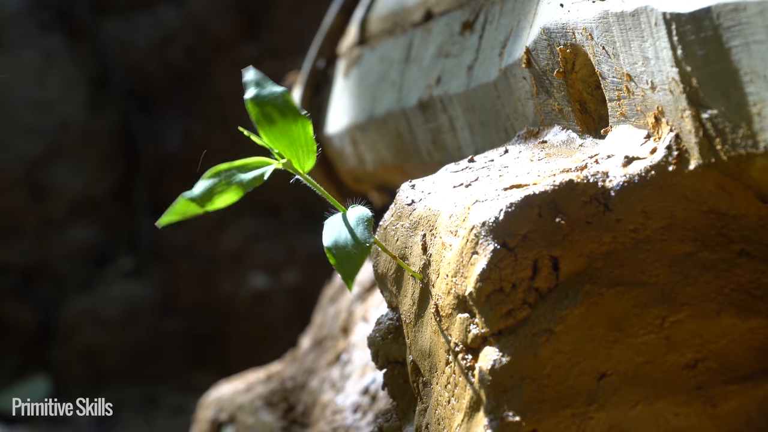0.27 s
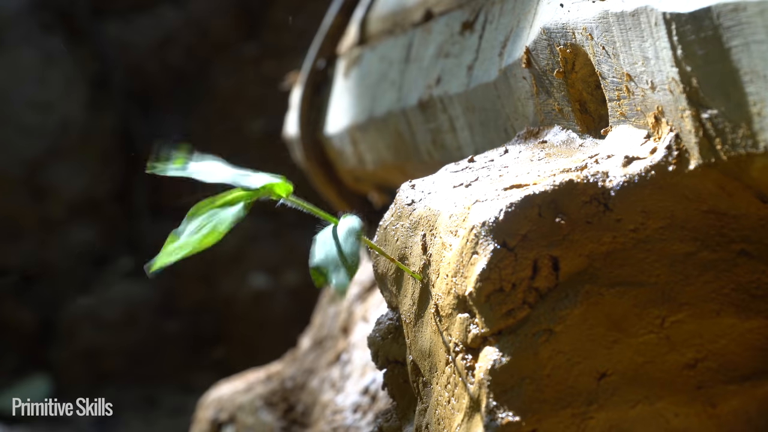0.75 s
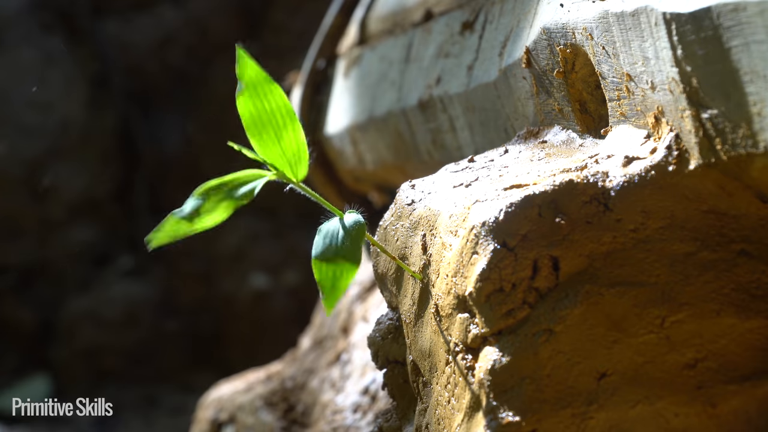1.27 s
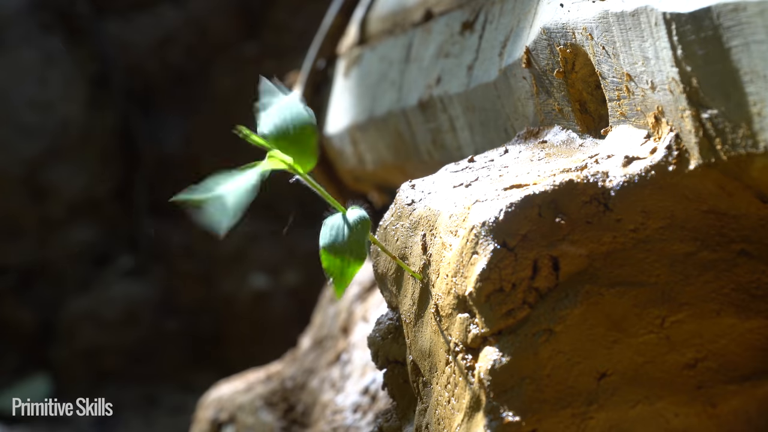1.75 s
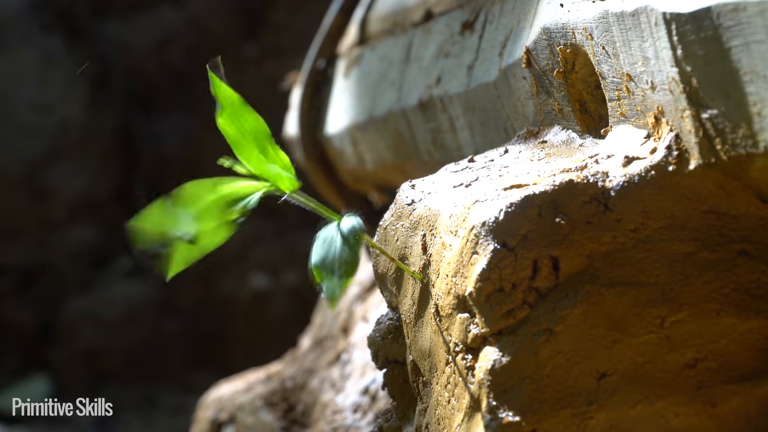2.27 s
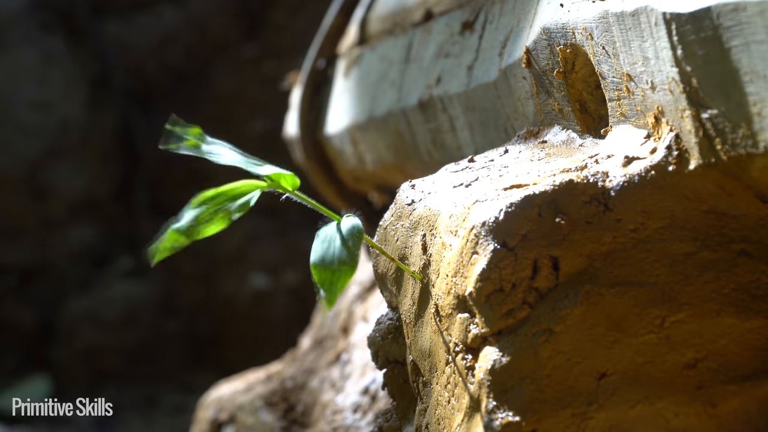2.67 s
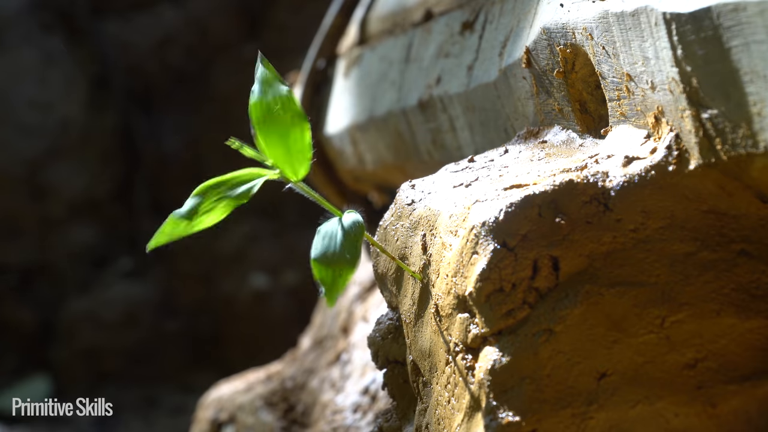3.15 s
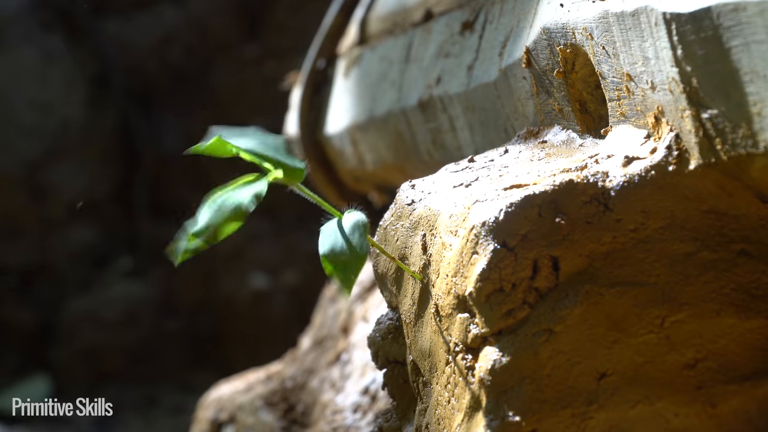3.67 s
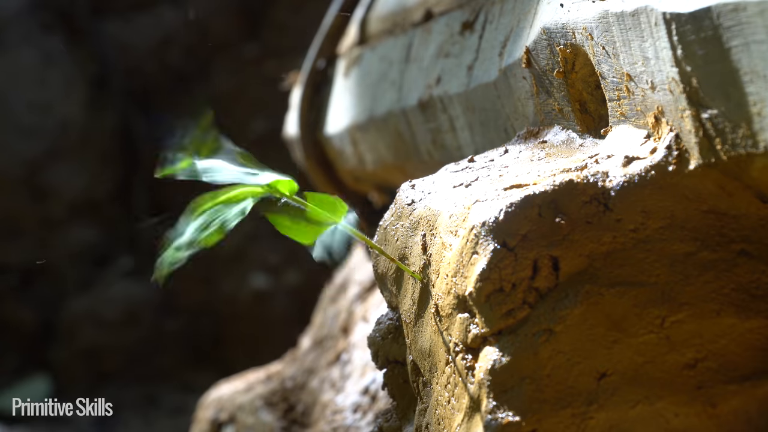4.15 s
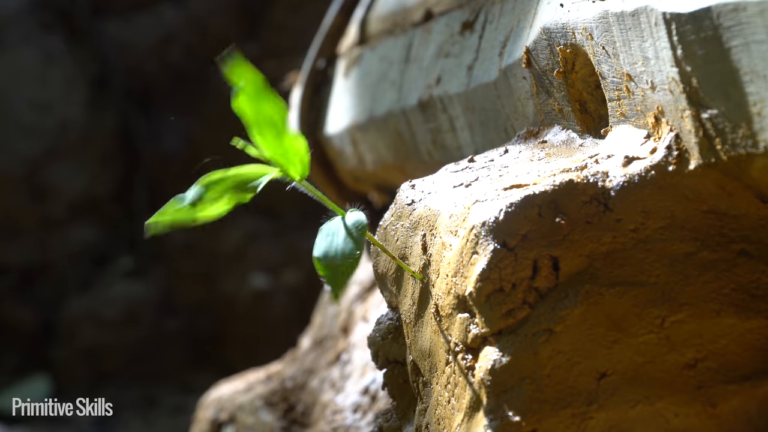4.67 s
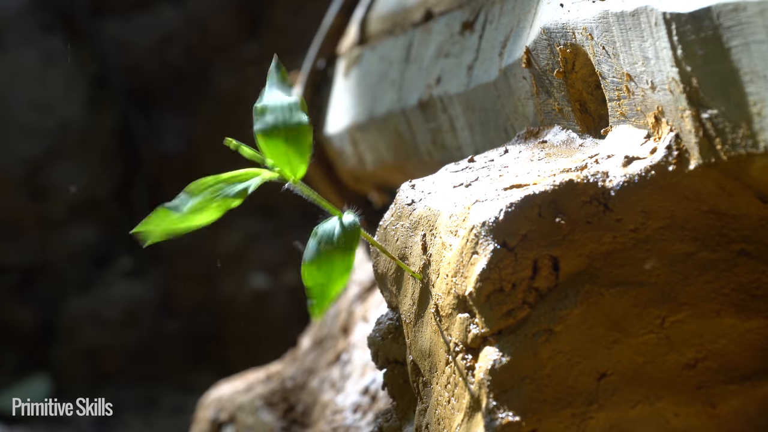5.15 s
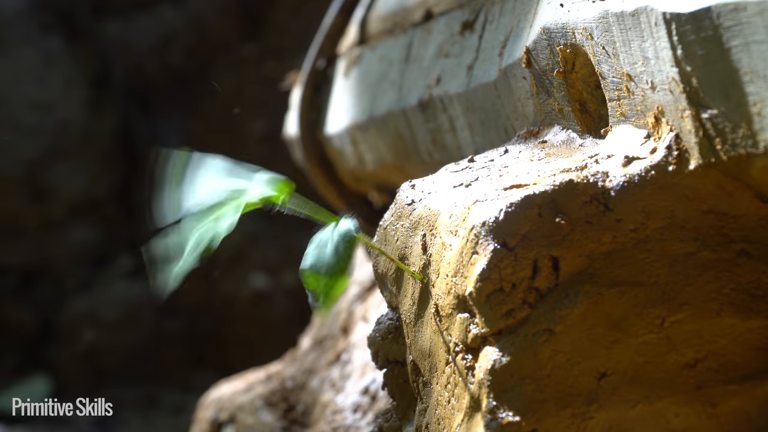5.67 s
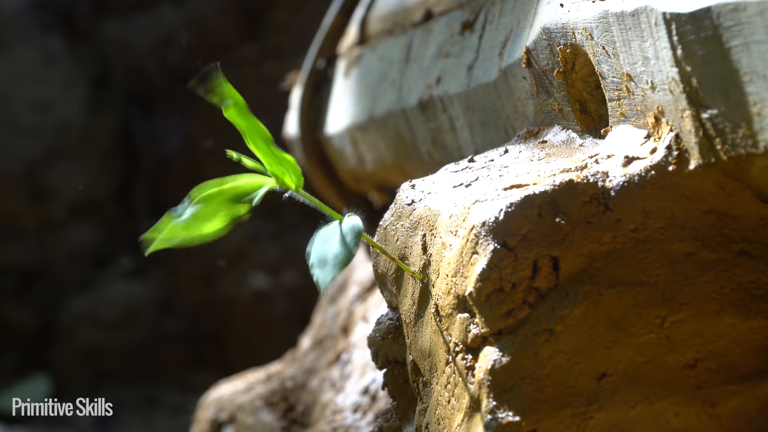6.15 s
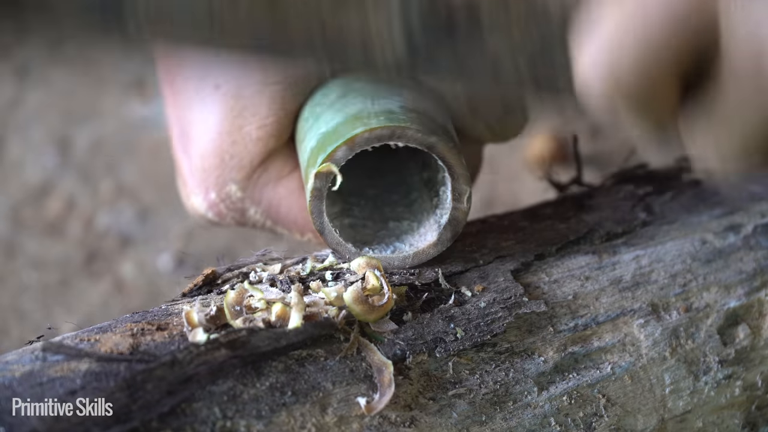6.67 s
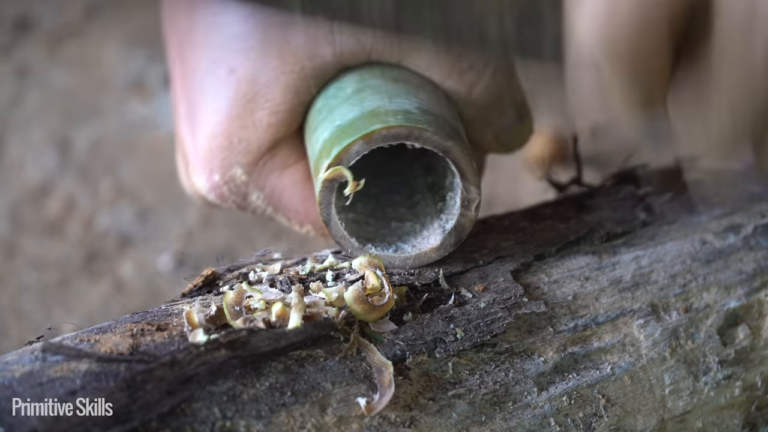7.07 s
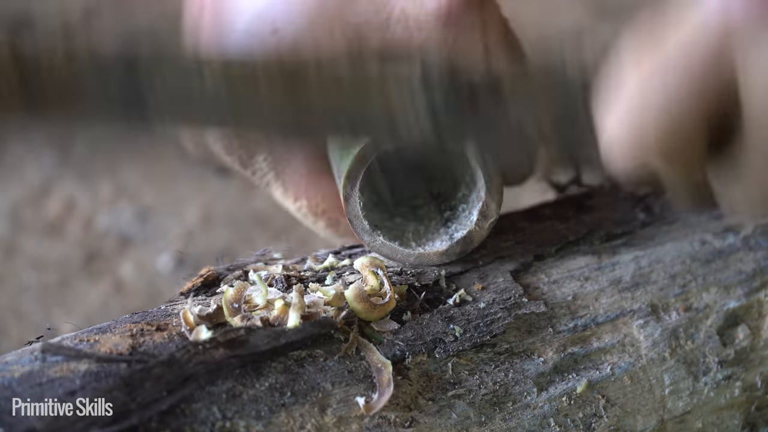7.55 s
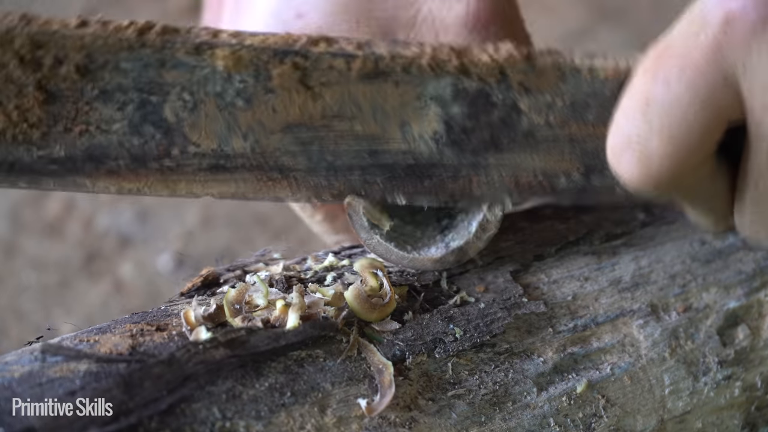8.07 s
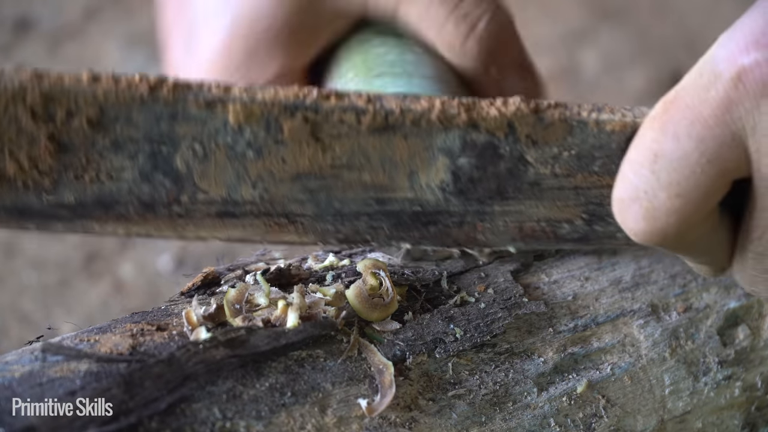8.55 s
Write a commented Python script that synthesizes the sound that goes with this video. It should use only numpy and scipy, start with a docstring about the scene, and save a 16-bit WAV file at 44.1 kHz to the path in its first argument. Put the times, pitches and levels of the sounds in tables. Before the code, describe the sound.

A wooden piston bellows pushes and pulls hoarse, hooting gusts of air with clacking flaps, then a heavy blade chops bamboo seven times.

```python
"""Air is already rushing through a wooden piston bellows as it blows into a clay furnace.
Shaped noise makes the rush, and the blowpipe hoots unevenly at its main resonance.
Ringing valve flaps clack and the hollow barrel thumps as the strokes turn.
Then a heavy blade pares a bamboo tube in seven quick chops: ringing blows, snapping fibres, echoes.
Two chops also knock on the log; a soft outdoor background of shaped noise runs throughout."""
import sys
import numpy as np
from scipy import signal
from scipy.fft import rfft, irfft
from scipy.io import wavfile
from scipy.ndimage import uniform_filter1d

SR = 44100
rng = np.random.default_rng(int(sys.argv[2]) if len(sys.argv) > 2 else 0)


def wav_record(signal):
    """Record a signal, one row per channel, as 16-bit PCM in the file named by sys.argv[1]."""
    frames = np.transpose(np.atleast_2d(signal))
    bounded = np.clip(frames, -1, 1)
    # unit amplitude maps onto the largest positive 16-bit level
    quanta = np.round(bounded * 32767).astype(np.int16)
    wavfile.write(sys.argv[1], SR, quanta)


N = 388080
TIME = np.arange(N) / SR


def amp(db):
    """Turn decibels into gain."""
    return 10 ** (np.asarray(db) / 20)


def unit(x):
    """Scale to rms 1."""
    return x / np.sqrt(np.mean(x ** 2))


def peak(x):
    """Scale to peak 1."""
    return x / np.max(np.abs(x))


def add(out, s, x):
    """Mix in a short sound at time s, if its start lies within the scene."""
    i = int(s * SR)
    if 0 <= i < N:
        out[i:i + len(x)] += x[:N - i]


def walk(rate_hz):
    """Smooth random wander with rms 1; a higher rate wanders faster."""
    hold = int(SR / rate_hz)
    steps = np.repeat(rng.standard_normal(N // hold + 1), hold)
    return unit(uniform_filter1d(steps, hold)[:N])


def colour(x, points):
    """Shape a sound by a spectrum of (frequency [Hz], gain [dB]) points."""
    hz, db = np.transpose(points)
    f = np.maximum(np.fft.rfftfreq(len(x), 1 / SR), 1)
    gain = amp(np.interp(np.log(f), np.log(hz), db))
    return irfft(rfft(x) * gain, len(x))


def lowpass(x, hz, order):
    """Soften the treble above hz."""
    return signal.sosfilt(signal.butter(order, hz, fs=SR, output="sos"), x)


def highpass(x, hz, order=2):
    """Thin out the bass below hz."""
    return signal.sosfilt(signal.butter(order, hz, "high", fs=SR, output="sos"), x)


def resonate(x, hz, width_hz):
    """One resonance with gain 1 at its centre."""
    return signal.lfilter(*signal.iirpeak(hz, hz / width_hz, fs=SR), x)


def ring(modes, detune, scatter_db):
    """Struck modes; each blow shifts their pitch and strength a little; wider modes die faster."""
    t = TIME[:SR // 6]
    sound = np.zeros(len(t))
    chance = rng.standard_normal((len(modes), 2))
    for (hz, width_hz, db), (stronger, sharper) in zip(modes, chance):
        decay = np.exp(-np.pi * width_hz * t)
        tone = np.sin(2 * np.pi * hz * (1 + detune * sharper) * t)
        sound += amp(db + scatter_db * stronger) * decay * tone
    return sound


# colour of the outdoor air, at the furnace and at the log: (frequency [Hz], relative level [dB])
FURNACE_COLOUR = [(30, 2), (70, -2.5), (150, -4), (600, -1), (900, 1), (1200, -13.5), (1800, -12.5),
                  (3200, -11.5), (5000, -20.5), (8000, -27.5), (16000, -37.5)]
YARD_COLOUR = [(18, -50), (30, -4), (93, -12), (199, -4.5), (280, -10), (404, -5.5), (526, -8), (584, -5.5),
               (740, -2), (1160, -8.5), (1390, -15.5), (2410, -15.5), (4080, -17.5), (11100, -37),
               (16000, -41)]


def outdoors(spectrum, db):
    """A soft background whose low part is restless while the distant hiss stays smooth."""
    air = unit(colour(rng.standard_normal(N), spectrum))
    restless = 0.069 * walk(14) * lowpass(air, 1100, order=1)
    return amp(db) * (air + restless)


def background(move_s=6.57, fade_s=0.0086):
    """The air at the furnace gives way quickly to the air at the log."""
    at_log = np.clip((TIME - move_s) / fade_s, 0, 1)
    furnace = outdoors(FURNACE_COLOUR, db=-40)
    yard = outdoors(YARD_COLOUR, db=-38)
    return (1 - at_log) * furnace + at_log * yard


def draught(at_s=5.24, spread_s=0.13, db=-36, hz=80, width_hz=35):
    """A low rumble of moving air, made of resonant noise, swells and fades once."""
    swell = amp(db) * np.exp(-((TIME - at_s) / spread_s) ** 2)
    noise = rng.standard_normal(N)
    return swell * unit(resonate(resonate(noise, hz, width_hz), hz, width_hz))


def thump(hz, db, decay_s=0.0083, rise_s=0.00056, sub_hz=85, sub_db=-16, sub_decay_s=0.0053):
    """A short boom: one fading tone with a weaker, deeper one under it."""
    t = TIME[:SR // 10]
    boom = np.sin(2 * np.pi * hz * t) * np.exp(-t / decay_s)
    sub = amp(sub_db) * np.sin(2 * np.pi * sub_hz * t) * np.exp(-t / sub_decay_s)
    return -amp(db) * peak((boom + sub) * (1 - np.exp(-t / rise_s)))


# push strokes of the piston: (time [s], length [s], relative rush level [dB], droop of effort [dB],
# mid-stroke sag [dB], relative hoot level [dB], flap level [dB])
PUSH_STROKES = [(0.377, 0.8, -26, 0.5, 5, -26.5, -8), (2.155, 0.79, -23.5, 4.5, 3.5, -27.5, -8),
                (3.9237, 0.81, -24.5, 6, 0, -29, -7.5), (5.691, .78, -25.5, 4, -0.5, -27.5, -8.5)]
# soft stops of the piston at the end of a stroke: (time [s], level [dB])
PISTON_STOPS = [(.212, -25), (1.228, -30), (2.013, -25), (3.8, -27), (5.581, -24)]


def barrel():
    """The pressure jumps as each push begins; the piston bumps softly and lower where it stops."""
    out = np.zeros(N)
    for s, *_ in PUSH_STROKES:
        add(out, s, thump(207, -11.5, decay_s=0.0059))
    for s, db in PISTON_STOPS:
        add(out, s, thump(130, db))
    return out


# modes of a flap on its seat: (frequency [Hz], width [Hz], relative level [dB])
FLAP_RINGING = [(159.3, 290, 2), (525, 220, -5), (716, 340, 6.5), (886, 35, -8.5), (1200, 250, -1.5),
                (1540, 500, 3), (2290, 420, 3), (2820, 213, -2)]


def clack(db, bright_hz, bounce_db, bounce_s=0.0065, chatter_db=-27, chatter_s=0.0049):
    """A flap slaps shut, chatters and bounces; a softer contact gives a duller clack."""
    t = TIME[:SR // 50]
    push = amp(chatter_db) * np.exp(-t / chatter_s) * rng.standard_normal(len(t))
    push[0] = 1  # the slap itself
    flap = ring(FLAP_RINGING, detune=0.025, scatter_db=1.2)
    slap = amp(db) * peak(lowpass(signal.fftconvolve(flap, push), bright_hz, order=4))
    bounce = np.pad(slap, (int(bounce_s * SR), 0))[:len(slap)]
    return slap + amp(bounce_db) * bounce


# pull strokes, the first already under way: (time [s], length [s], relative rush level [dB],
# droop of effort [dB], relative hoot level [dB], flap level [dB], wait for second flap [s])
PULL_STROKES = [(-.54, 0.72, -35, 1, -28, -5, .055), (1.282, .73, -30.5, 4, -29, -4, 0.049),
                (3.0469, 0.734, -30, 6.5, -27.5, -4.5, .0557), (4.816, 0.73, -30.5, 4.5, -26, -3.5, 0.059)]


def valves(push_lead_s=0.0146):
    """Flaps shut in pairs: one just ahead of a push and one with it; a sharp then a dull one on a pull."""
    out = np.zeros(N)
    for s, *_, db in PUSH_STROKES:
        add(out, s - push_lead_s, clack(db, 1960, bounce_db=-10.5, chatter_db=-18, chatter_s=0.0076))
        add(out, s, clack(db - 3, 3080, bounce_db=-26))
    for s, *_, db, wait_s in PULL_STROKES:
        add(out, s, clack(db, 3180, bounce_db=-23, chatter_db=-26.5, chatter_s=0.0032))
        add(out, s + wait_s, clack(db - 1, 1230, bounce_db=-23))
    return out


def stroke(s, length, sag_db, droop_db, lead_s, attack_s, release_s, overrun_s):
    """Gain of one stroke: it builds up, holds while it droops and may sag midway, then runs out."""
    travel = np.clip((TIME - s) / length, 0, 1)
    attack = np.clip((TIME - s + lead_s) / attack_s, 0, 1)
    release = np.clip((s + length + overrun_s - TIME) / release_s, 0, 1)
    slack = np.exp(-((travel - 0.46) / 0.17) ** 2)
    hold = amp(-droop_db * travel - sag_db * slack)
    return attack * np.sin(np.pi / 2 * release) ** 2 * hold


# upper resonances of the blowpipe: (frequency [Hz], width [Hz], relative level [dB])
PIPE_RESONANCES = [(1219, 140, 4), (1515, 330, -3.5), (2090, 77, -2), (2510, 64, -10.5), (3084, 146, -5.5),
                   (5800, 430, -5)]


def rush(flow, spectrum, pipe_db, flutter_db, surge_db, db):
    """Turbulent air in the nozzle, coloured by the pipe; a weak flow is duller."""
    air = colour(rng.standard_normal(N), spectrum)
    pipe = sum(amp(g) * resonate(air, hz, width_hz) for hz, width_hz, g in PIPE_RESONANCES)
    air = air + amp(pipe_db) * pipe
    treble = signal.sosfiltfilt(signal.butter(2, 1100, "high", fs=SR, output="sos"), air)
    # the body weakens less than the treble as the flow drops
    body = (air - treble) * flow.max() * (flow / flow.max()) ** 0.74
    gain = amp(db + flutter_db * walk(35) + surge_db * walk(8.3))
    return gain * (flow * treble + body) / np.std(treble)


# colour of the rushing air on a push and on a pull: (frequency [Hz], relative level [dB])
PUSH_COLOUR = [(30, -26), (90, -12.5), (170, -3), (280, -0.5), (450, -2.5), (660, -1), (800, 9.5),
               (1000, -2.5), (2000, -1), (3300, -1.5), (4250, -8.5), (4900, -17), (6800, -26), (11000, -29),
               (16000, -48)]
PULL_COLOUR = [(30, -3), (110, 3), (310, 11.5), (420, 0), (660, 2.5), (800, 13), (1000, -2.5), (1800, -2),
               (2400, 0), (2750, -3.5), (3150, -4), (4300, -11), (6300, -25.5), (11000, -27.5),
               (16000, -40)]
# each flow starts ahead of its stroke time and runs on past its end
PUSH_FLOW = dict(lead_s=0.029, attack_s=0.11, release_s=0.19, overrun_s=0.034)
PULL_FLOW = dict(lead_s=0.027, attack_s=0.22, release_s=0.17, overrun_s=0.042)
PUSH_SEEP = dict(lead_s=0.069, attack_s=0.025, release_s=0.046, overrun_s=0.02)


def air_rush(seep_db=-47.5):
    """Pushes and pulls drive the air; a little seeps through as soon as the hand leans on the piston."""
    push_flow, seep, pull_flow = np.zeros(N), np.zeros(N), np.zeros(N)
    for s, length, db, droop_db, sag_db, *_ in PUSH_STROKES:
        push_flow += amp(db) * stroke(s, length, sag_db, droop_db, **PUSH_FLOW)
        seep += amp(seep_db) * stroke(s, length, 0, 0, **PUSH_SEEP)
    for s, length, db, droop_db, *_ in PULL_STROKES:
        pull_flow += amp(db) * stroke(s, length, 0, droop_db, **PULL_FLOW)
    push_flow = np.hypot(push_flow, seep)
    push = rush(push_flow, PUSH_COLOUR, pipe_db=0.5, flutter_db=0.85, surge_db=0.5, db=-1)
    pull = rush(pull_flow, PULL_COLOUR, pipe_db=-1, flutter_db=0.5, surge_db=-0.17, db=-0.5)
    return push + pull


# short toots as the pipe catches and whistles: (time [s], length [s], relative level [dB])
PIPE_TOOTS = [(0.06, 0.025, -29), (.296, 0.022, -34), (0.397, 0.036, -23), (.474, 0.017, -20),
              (0.712, 0.041, -21.5), (0.974, 0.062, -23.5), (1.077, 0.011, -18.5), (1.267, 0.01, -17.5),
              (1.387, 0.058, -26.5), (1.61, 0.041, -16.5), (1.665, 0.029, -19.5), (1.785, 0.065, -21.5),
              (1.861, 0.095, -25.5), (2.253, 0.021, -22), (2.763, 0.013, -19), (3.067, 0.021, -23),
              (3.387, 0.088, -20.5), (3.539, 0.041, -19.5), (3.593, 0.021, -21), (3.672, 0.015, -21.5),
              (3.992, 0.032, -22.5), (4.525, .025, -27.5), (4.608, 0.0084, -24.5), (5.194, 0.089, -21.5),
              (5.405, 0.035, -18.5), (5.957, 0.09, -22), (6.276, 0.048, -26)]


def toots(rise_s=0.0014, release_s=0.00695, falter_s=0.013, falter_db=-6):
    """Strength of the toots, and gain of the steady hoot, which falters just before each one catches."""
    out, falter, t = np.zeros(N), np.zeros(N), TIME[:SR // 5]
    dip = np.hanning(int(1.33 * falter_s * SR))
    for s, length, db in PIPE_TOOTS:
        release = np.exp(-np.maximum(t - length, 0) / release_s)
        add(out, s, amp(db) * (1 - np.exp(-t / rise_s)) * release)
        add(falter, s - falter_s, dip)
    return out, amp(falter_db * falter)


# the blowpipe answers even a weak flow, so it sounds earlier and mostly for longer
PUSH_HOOT = dict(lead_s=0.079, attack_s=0.12, droop_db=5.5, release_s=0.17, overrun_s=0.078)
PULL_HOOT = dict(lead_s=0.047, attack_s=0.16, droop_db=0, release_s=0.083, overrun_s=0.034)


def hoot(hz=903, wander_hz=19, toot_wander_hz=9, tone_db=-3.5, breathy_db=-2.5):
    """The pipe's main resonance mixes noise and a wavering whistle; in a toot its pitch steadies."""
    drive = np.zeros(N)
    for s, length, _, _, sag_db, db, _ in PUSH_STROKES:
        drive += amp(db) * stroke(s, length, sag_db / 2, **PUSH_HOOT)
    for s, length, _, _, db, _, _ in PULL_STROKES:
        drive += amp(db) * stroke(s, length, 0, **PULL_HOOT)
    toot, falter = toots()
    drive = drive * falter
    lock = toot / (toot + drive / 2 + 1e-9)  # near 1 while a toot dominates
    pitch = hz + ((1 - lock) * wander_hz + lock * toot_wander_hz) * walk(70)
    tone = unit(np.sin(2 * np.pi * np.cumsum(pitch) / SR))
    steady = amp(tone_db) * drive * unit(amp(3 * walk(55)))
    strength = np.hypot(steady, toot * unit(amp(3.7 * walk(90))))
    breathy = unit(resonate(resonate(rng.standard_normal(N), 845, 91), 895, 93))
    return strength * tone + amp(breathy_db) * drive * breathy


# modes of the log: (frequency [Hz], width [Hz], relative level [dB])
LOG_MODES = [(95, 14, -13), (160, 25, -5), (260, 33, -5), (364, 23, 2.5), (419, 33, 5), (542, 23, -4),
             (756, 84, 3)]
# knocks of hand and tube on the log: (time [s], level [dB], brightness [Hz])
LOG_KNOCKS = [(7.5174, -4.5, 1000), (8.405, -20, 250)]


def knocks(tick_db=-24, rattle_db=-22, rattle_s=0.0081, ground_db=-10):
    """A chop that follows through thuds on the log and the ground under it, and scuffs the bark."""
    out, t = np.zeros(N), TIME[:SR // 20]
    for s, db, bright_hz in LOG_KNOCKS:
        push = amp(rattle_db) * rng.standard_normal(len(t)) * np.exp(-t / rattle_s)
        push[0] = 1  # the knock itself
        wood = highpass(ring(LOG_MODES, detune=0.02, scatter_db=1.5), 50)
        thud = peak(lowpass(signal.fftconvolve(wood, push), bright_hz, order=2))
        scuff = rng.standard_normal(len(t)) * np.exp(-t / 0.0017)
        ground = thump(140, db + ground_db, decay_s=0.0053, sub_hz=75, sub_db=-17, sub_decay_s=0.012)
        add(out, s, amp(db) * thud)
        add(out, s, ground)
        add(out, s, amp(db + tick_db) * scuff)
    return out


def gritty_noise(count, grit_db=4):
    """Noise whose strength jumps at random from sample to sample."""
    return rng.standard_normal(count) * amp(grit_db * rng.standard_normal(count))


# colour of the parting fibres: (frequency [Hz], relative level [dB])
FIBRE_COLOUR = [(200, -12), (1200, 2.5), (2200, -7), (3400, 13), (5000, 4.5), (6500, -7), (10000, -5.5),
                (16000, -21)]


def slice_fibres(t, tube, wait_s, length_s, bright_hz, tear_db=2):
    """Fibres snap one after another, heard directly and through the ringing tube."""
    corners = [wait_s - 0.002, wait_s, wait_s + length_s, wait_s + length_s + 0.002]
    pressure = np.interp(t, corners, [0, 1, 1, 0])
    snaps = pressure * unit(colour(gritty_noise(len(t)), FIBRE_COLOUR))
    through = np.std(snaps) * unit(signal.fftconvolve(snaps, tube)[:len(t)])
    cut = (through + amp(tear_db) * snaps) / np.hypot(1, amp(tear_db))
    return lowpass(cut, bright_hz, order=1)


# colour of the echo from the surroundings: (frequency [Hz], relative level [dB])
ECHO_COLOUR = [(30, -13), (100, 5.5), (400, -3.5), (850, 0.5), (1500, -7.5), (2300, -4.5), (3300, 2),
               (4500, -6.5), (6500, -18.5), (10000, -18.5), (16000, -34)]


def surroundings(t, tube, echo_s=0.029, decay_s=0.031, early_db=-7, ring_db=-7):
    """Scattered reflections gather, then die away, carrying some of the tube's ring."""
    gather = np.minimum(t / 0.0064, 1) * amp(early_db * np.clip(1 - t / echo_s, 0, 1))
    fade = gather * np.exp(-np.maximum(t - echo_s, 0) / decay_s)
    scatter = unit(colour(gritty_noise(len(t)), ECHO_COLOUR))
    ringing = unit(signal.fftconvolve(scatter, tube)[:len(t)])
    return fade * unit(scatter + amp(ring_db) * ringing)


# modes of the bamboo tube under the blade: (frequency [Hz], width [Hz], relative level [dB])
BAMBOO_MODES = [(345, 62, -17), (596, 37, -9.5), (897, 83, 1.5), (950, 55, -8), (1267, 45, -4),
                (1476, 68, -3), (2220, 127, 8), (2380, 130, 6), (2540, 146, 10.5), (2660, 130, -1),
                (2990, 160, 6.5), (3355, 140, 5), (3570, 250, -9), (4190, 150, -10), (4800, 210, -16),
                (5260, 400, -4), (6940, 91, -11), (7700, 250, -20), (8200, 150, -6.5), (9300, 120, 1),
                (12800, 200, -19)]
# chops: (time [s], blow level [dB], blow brightness [Hz], wait for slice [s], slice length [s],
# relative slice level [dB], slice brightness [Hz], relative echo level [dB])
BLADE_CHOPS = [(6.6091, 4.5, 1340, 0.003, 0.0077, -13.5, 11000, 0),
               (6.894, 4, 1290, 0.0036, 0.0052, -9.5, 14000, 2.5),
               (7.1875, 3, 1700, 0.0051, .007, -11, 12000, 2.5),
               (7.49, 5, 3500, 0.0029, 0.002, -15, 6000, 1.5),
               (7.7816, 4, 3040, 0.0036, 0.0057, -11, 4500, 1),
               (8.081, 3.5, 3530, 0.0012, 0.0026, -9.5, 9000, 3),
               (8.3678, 1, 1100, 0.0062, 0.008, -11, 11000, 1)]


def chops(crack_db=-26, crack_s=0.0027, echo_db=-27):
    """The edge strikes the tube, then slices through a run of fibres; the surroundings answer."""
    out, t = np.zeros(N), TIME[:SR // 3]
    for s, blow_db, bright_hz, wait_s, length_s, slice_db, slice_hz, wet_db in BLADE_CHOPS:
        # the tube's ring carries little bass
        tube = peak(highpass(ring(BAMBOO_MODES, detune=0.022, scatter_db=4), 470))
        # a glancing edge presses on for longer, which rounds the blow
        blow = -peak(lowpass(tube, bright_hz, order=1))
        crack = rng.standard_normal(len(t)) * np.exp(-t / crack_s)
        add(out, s, amp(blow_db) * blow)
        add(out, s, amp(blow_db + crack_db) * crack)
        add(out, s, amp(slice_db) * slice_fibres(t, tube, wait_s, length_s, slice_hz))
        add(out, s, amp(echo_db + wet_db) * surroundings(t, tube))
    return out


def scene():
    """First the bellows at the furnace, then the blade at the log."""
    bellows = draught() + barrel() + valves() + air_rush() + hoot()
    paring = knocks() + chops()
    return (background() + bellows + paring)[None]


def record(dry):
    """The microphone sheds the lowest rumble, the loudest blows overload, and the top is cut."""
    thin = highpass(dry, 42, order=1)
    clipped = np.clip(thin, -0.63, 0.63)
    return signal.sosfilt(signal.ellip(8, 0.2, 70, 15800, fs=SR, output="sos"), clipped)


dry = scene()
out = record(dry)
wav_record(out)
```